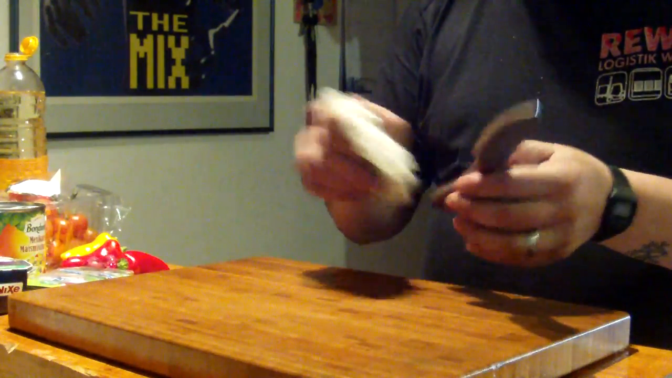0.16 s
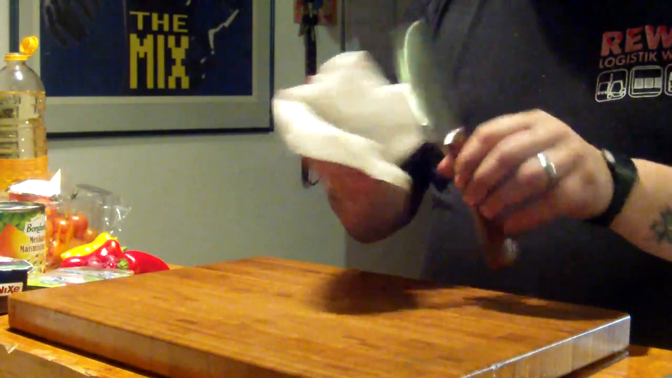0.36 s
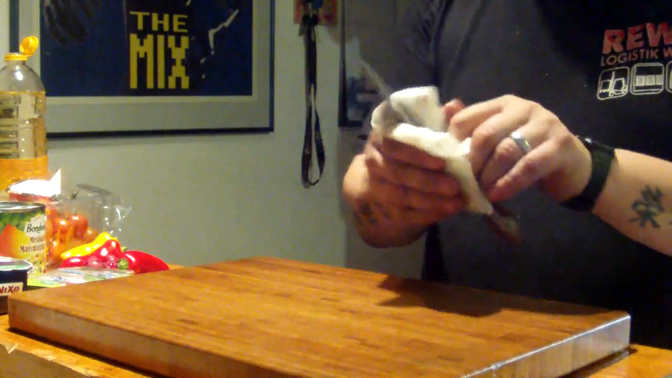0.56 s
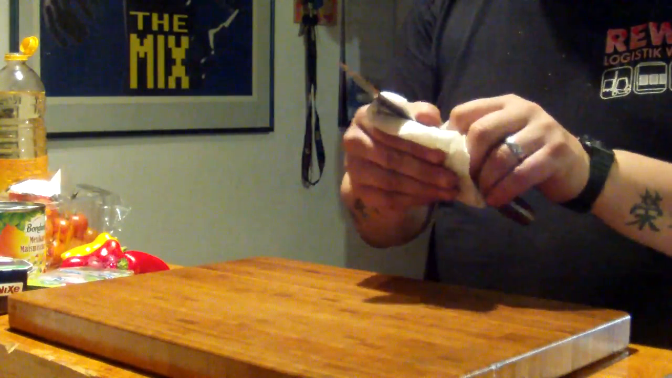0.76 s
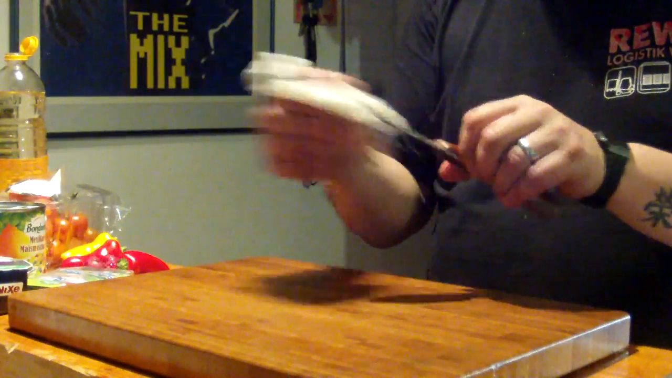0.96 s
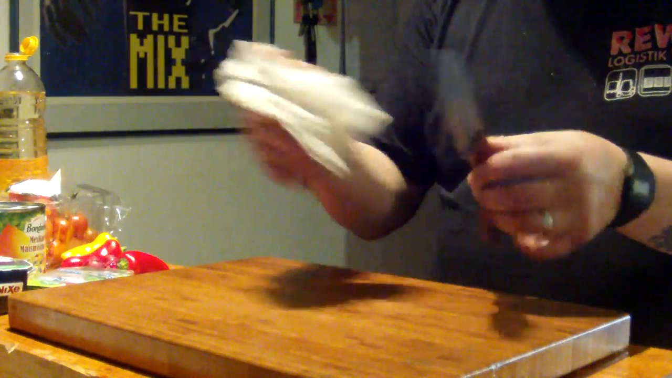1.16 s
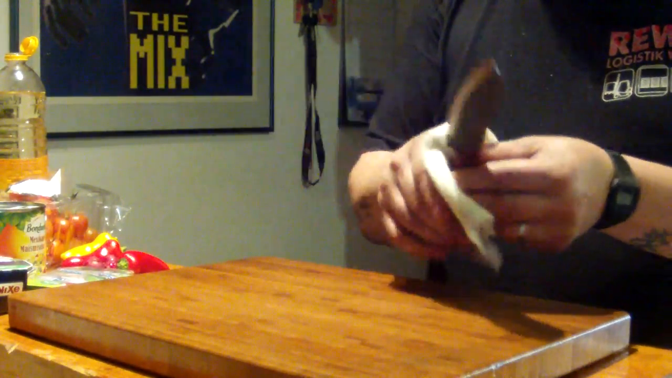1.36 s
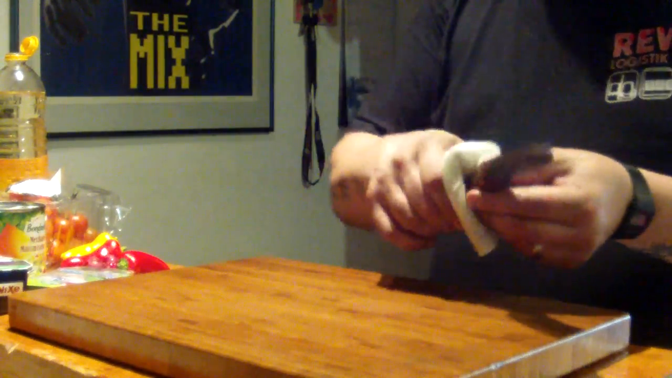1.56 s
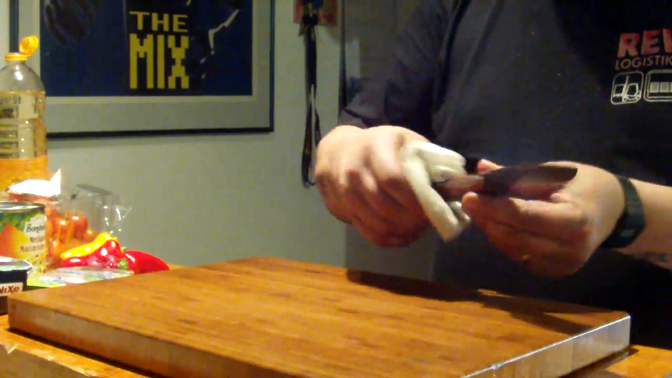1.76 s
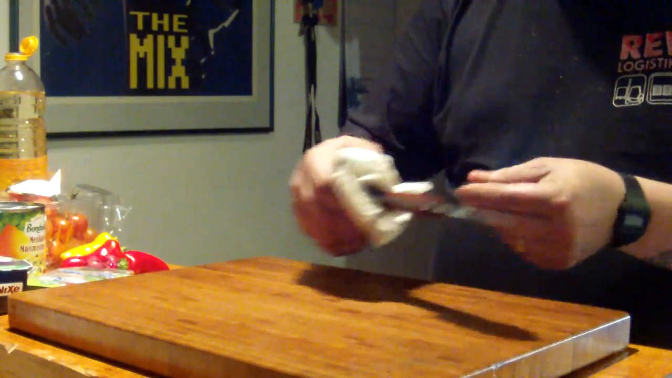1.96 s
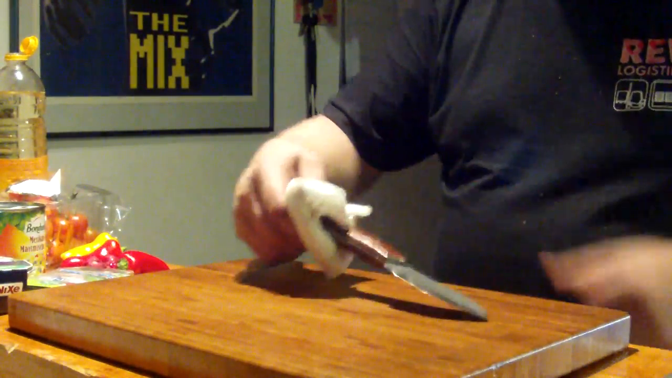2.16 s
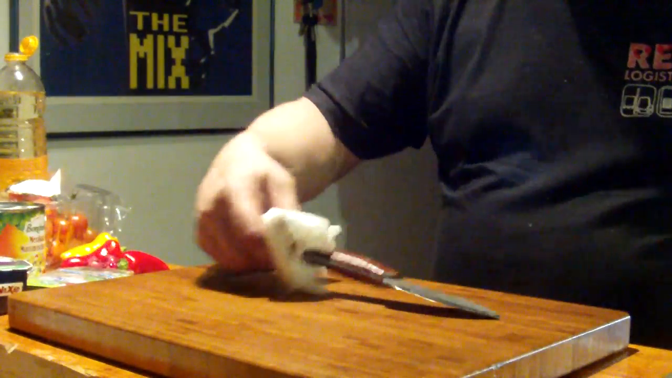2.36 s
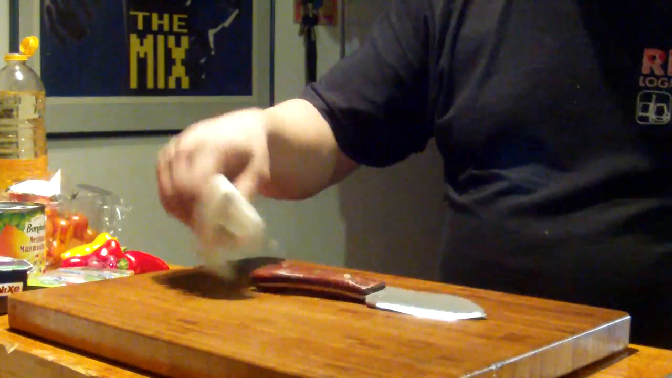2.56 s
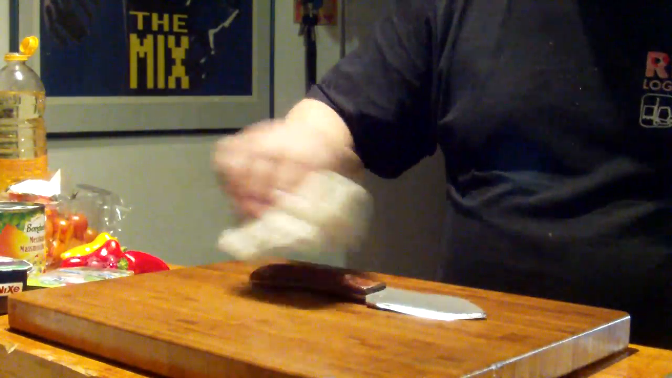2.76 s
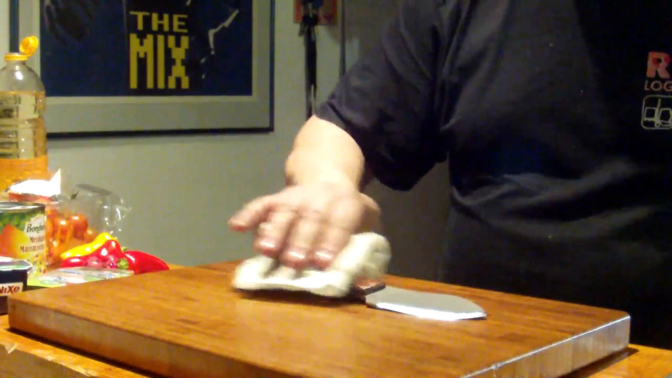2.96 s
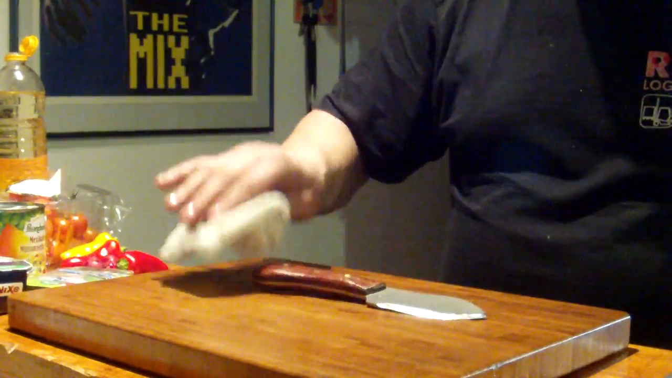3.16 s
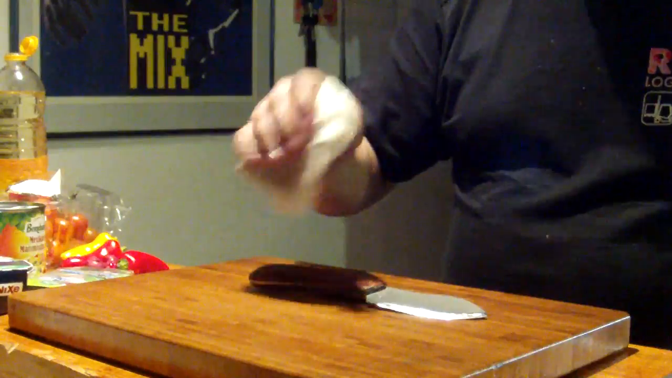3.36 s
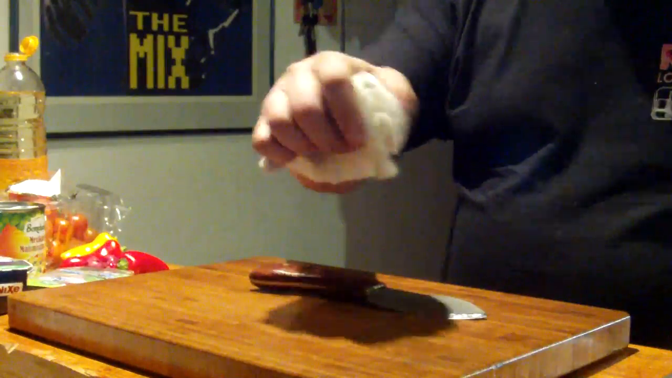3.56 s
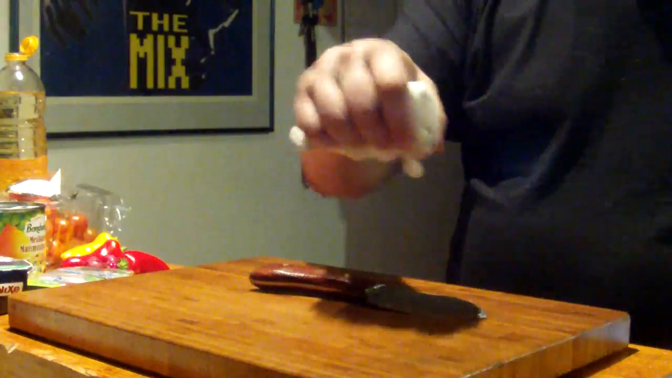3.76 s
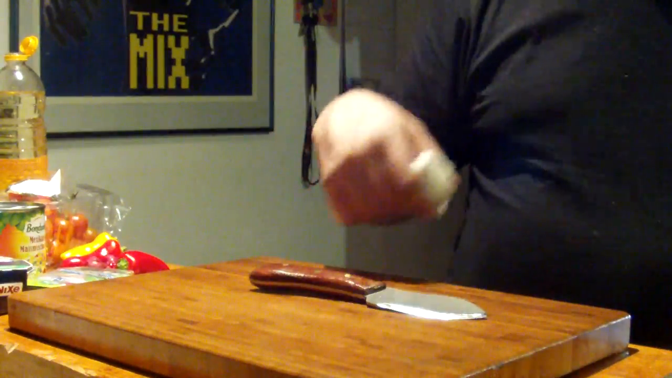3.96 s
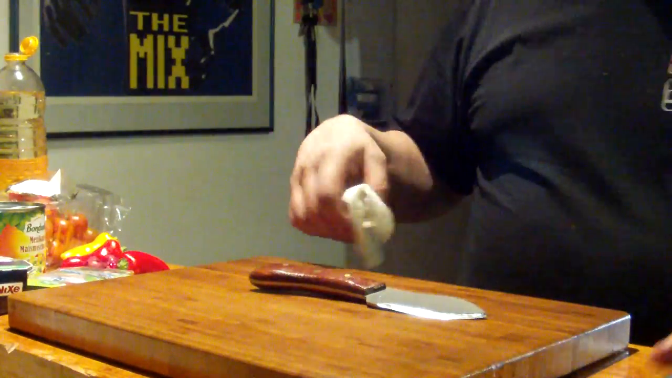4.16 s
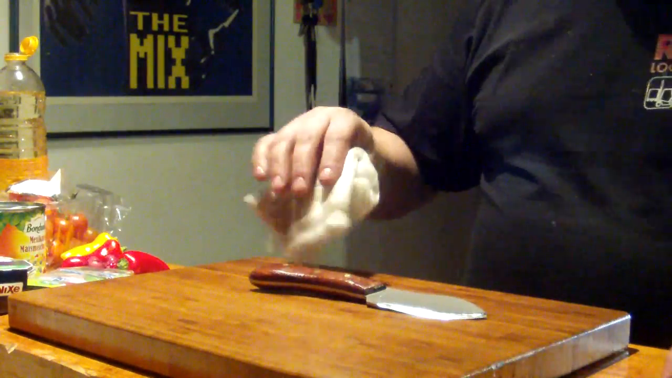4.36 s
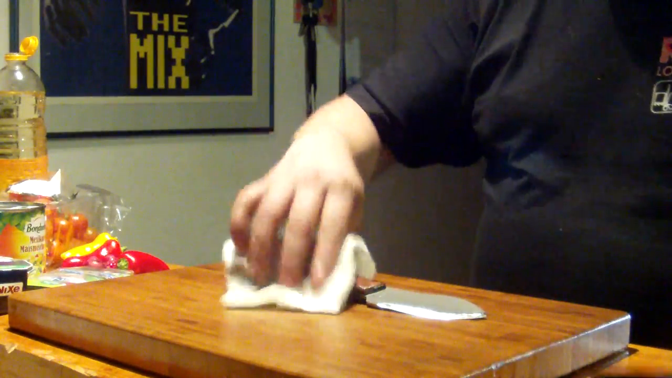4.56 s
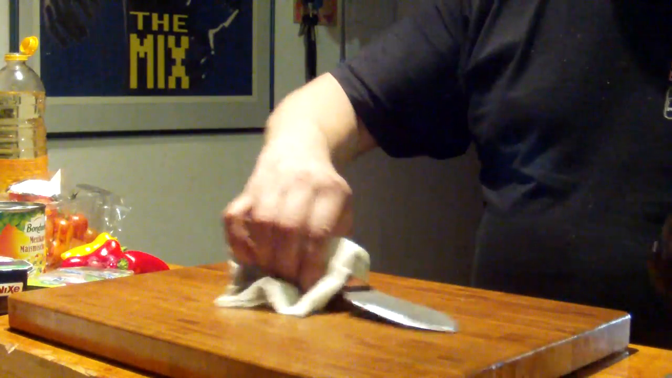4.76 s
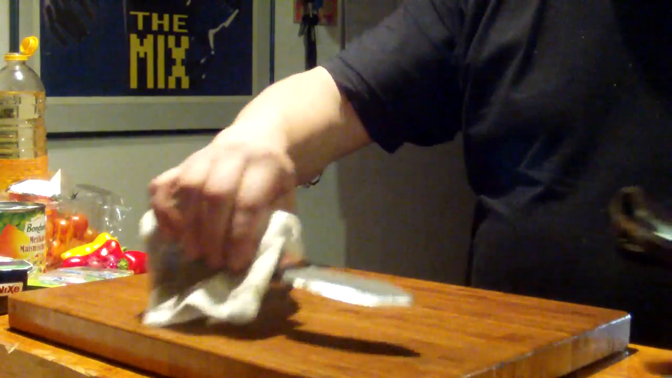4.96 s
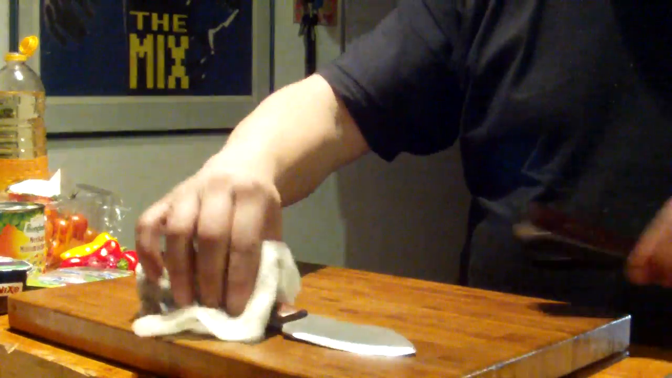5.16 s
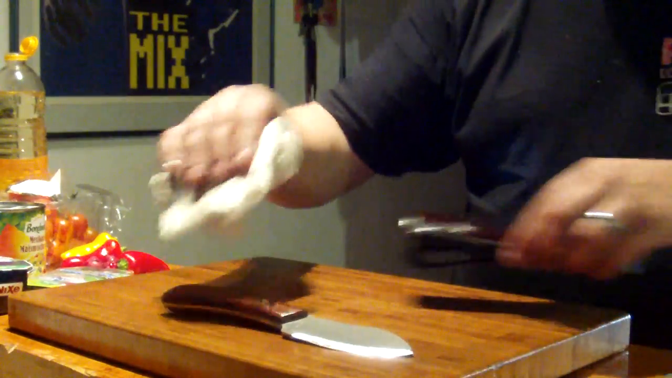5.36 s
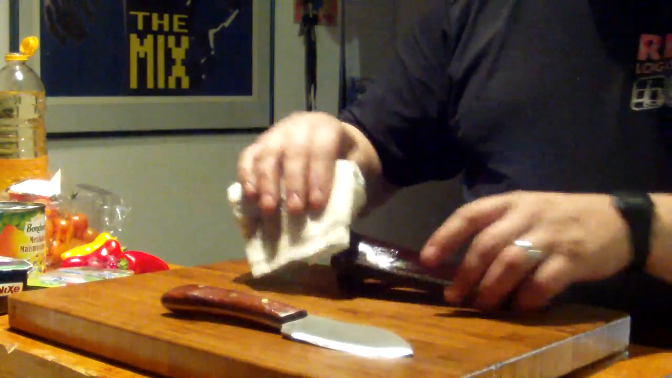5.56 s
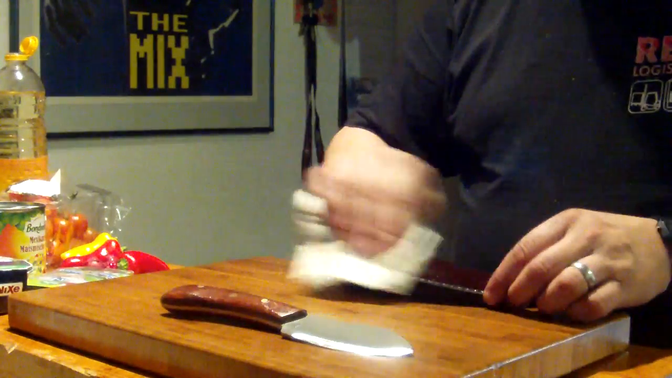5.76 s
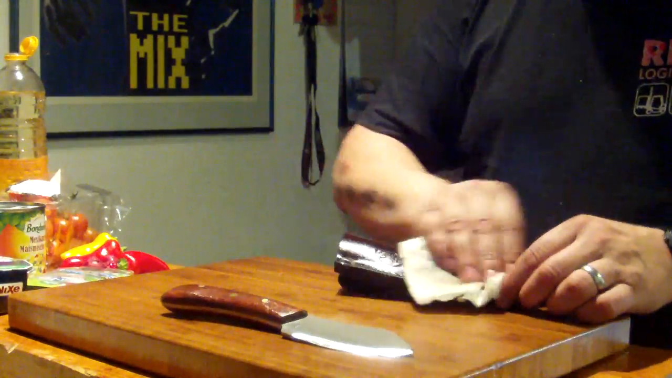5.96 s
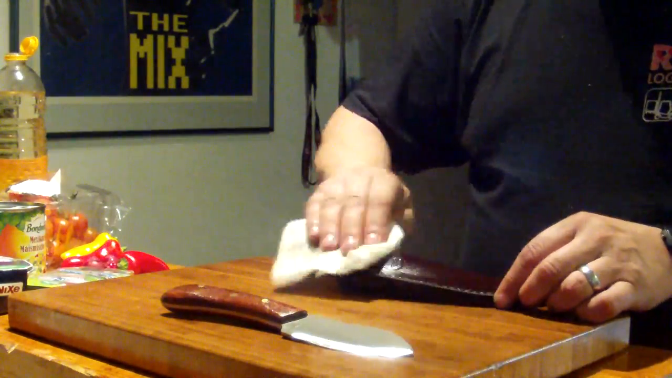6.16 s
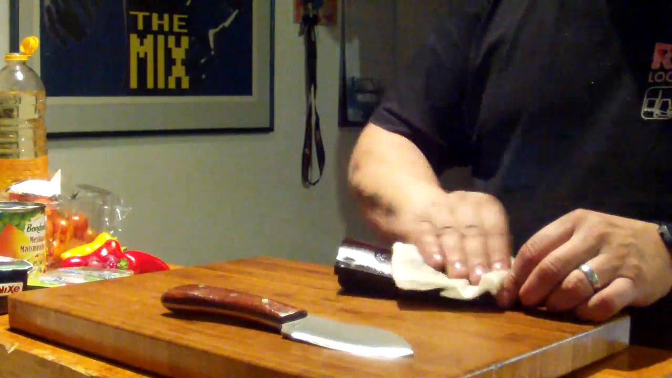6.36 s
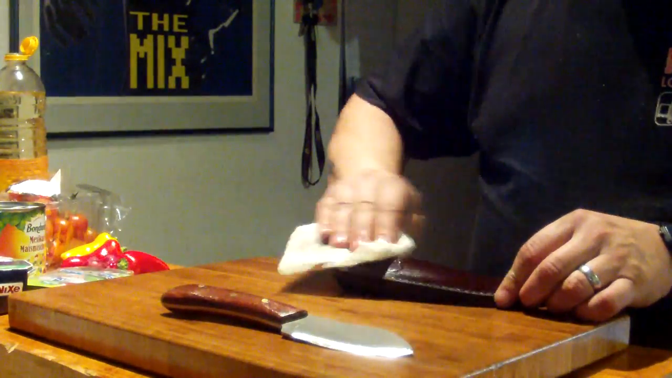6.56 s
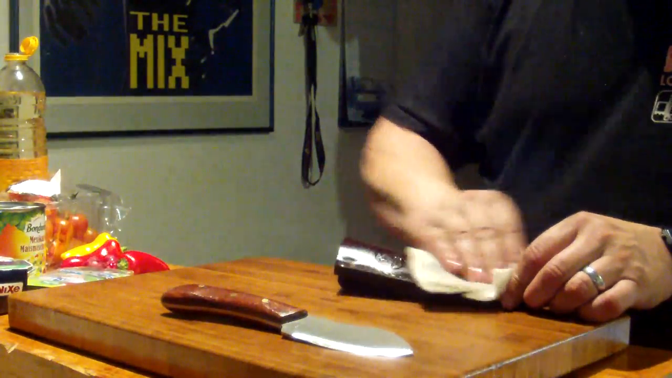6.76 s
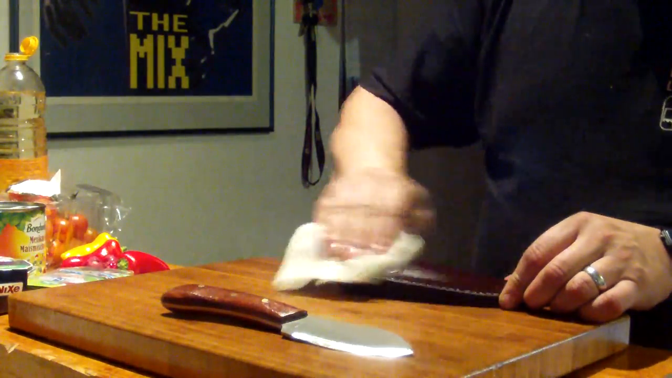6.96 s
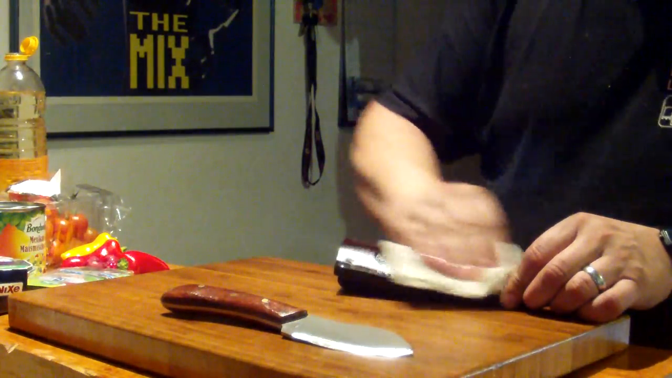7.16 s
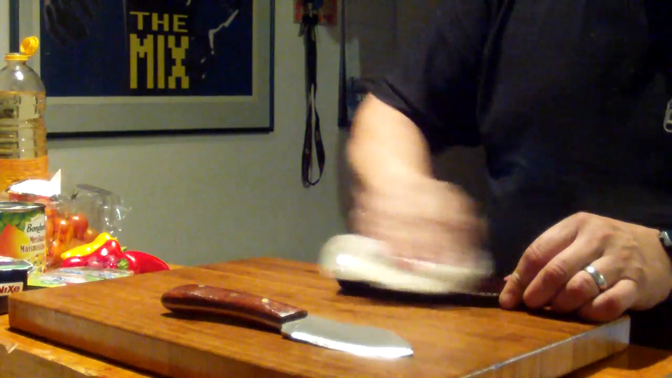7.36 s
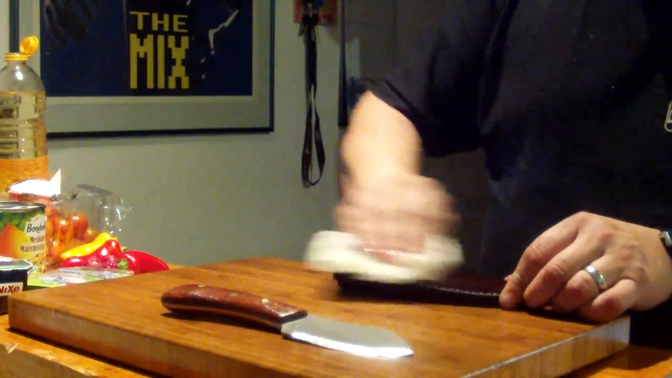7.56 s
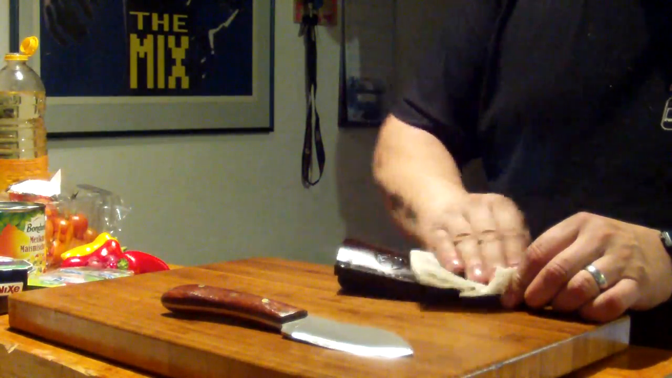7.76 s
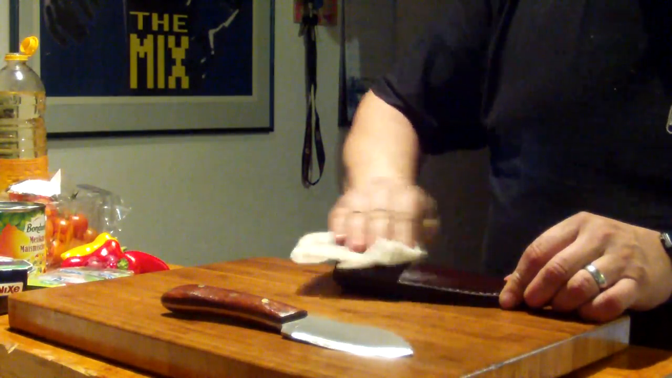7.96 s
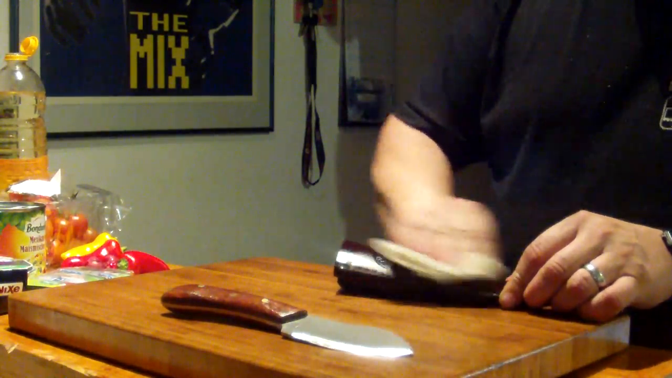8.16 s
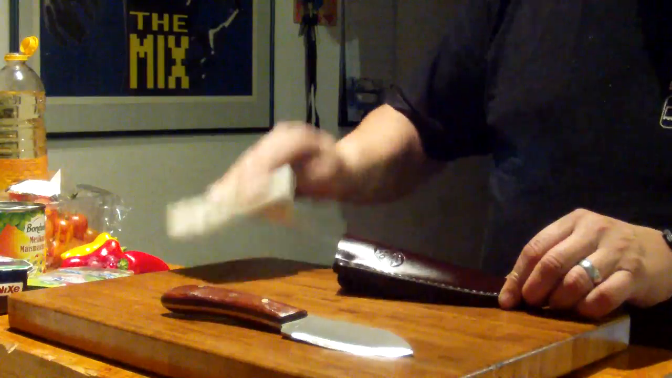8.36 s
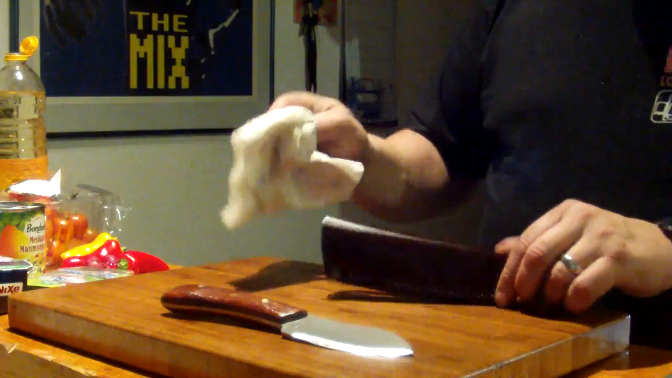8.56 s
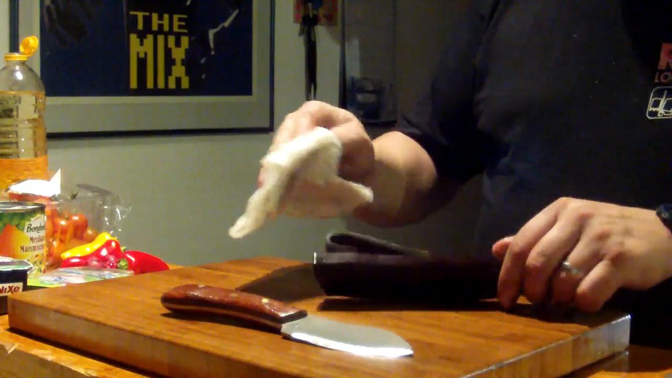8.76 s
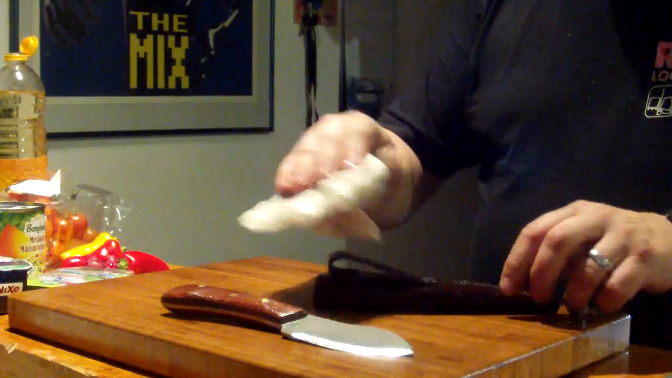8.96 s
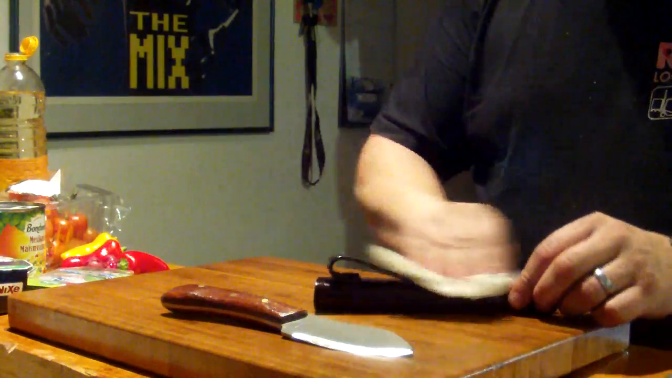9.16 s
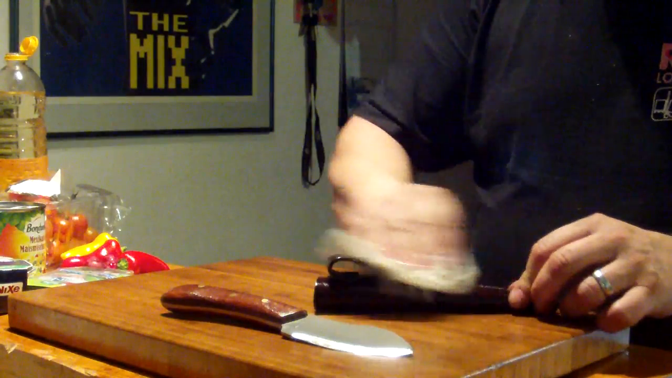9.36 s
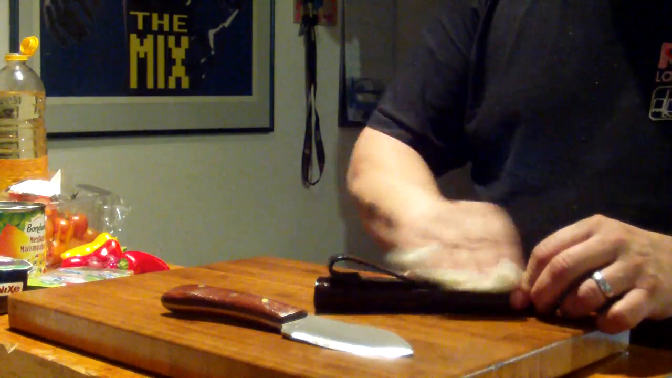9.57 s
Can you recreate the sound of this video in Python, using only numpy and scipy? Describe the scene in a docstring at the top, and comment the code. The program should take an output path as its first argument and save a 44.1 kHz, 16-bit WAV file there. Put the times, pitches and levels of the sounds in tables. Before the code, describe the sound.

Soft towel wipes, hard knife knocks on a wooden board, and quick dry scrubbing of a sheath, over camera ticking and low traffic rumble.

```python
"""A paper towel wipes a knife and its leather sheath over a thick board in a small kitchen: shaped grain noise.
Blade, handle and sheath knock on the wood (ringing modes, noisy cracks); creases in the paper tick.
A camera's lens drive ticks and sings through its case, and its electronics whine on steady sines.
Behind lie soft room hiss and tyre roar from noise, a deep unsteady rumble and an engine from wandering sines."""
import sys
import numpy as np
from scipy import signal
from scipy.fft import rfft, irfft
from scipy.io import wavfile

SR = 44100
rng = np.random.default_rng(int(sys.argv[2]) if len(sys.argv) > 2 else 0)


def store_wav(level_fs):
    """Save 16-bit WAV to argv[1]."""
    pcm = np.round(np.clip(np.atleast_2d(level_fs), -1, 1) * 32767)
    wavfile.write(sys.argv[1], SR, pcm.T.astype(np.int16))


N = 424683

# towel strokes, first on the knife, later back and forth along the sheath:
# start t/s, length/s, hiss level/dB, rub level/dB
STROKES = [(0.0, .2, -74, -69), (0.492, .14, -86, -80), (0.666, 0.087, -72.5, -64),
           (0.864, 0.17, -67.5, -66), (1.39, 0.075, -76.5, -71), (1.513, .36, -69.5, -64),
           (2.416, 0.17, -70, -74), (2.9, .2, -79, -72), (3.5, .22, -79, -65.5), (4.685, 0.21, -72, -61),
           (5.791, 0.28, -69.5, -65), (6.065, 0.22, -66, -65), (6.3, 0.15, -64.5, -64),
           (6.478, 0.17, -66.5, -66.5), (6.688, 0.16, -64, -60.5), (6.854, .18, -64.5, -61.5),
           (7.057, 0.15, -64.5, -59.5), (7.233, 0.16, -64.5, -62), (7.415, .13, -64, -59),
           (7.563, 0.16, -64.5, -63), (7.745, .13, -64.5, -59.5), (7.894, 0.15, -65, -64),
           (8.075, 0.14, -65, -62.5), (8.224, 0.16, -64, -61), (8.628, 0.2, -83, -70),
           (9.197, .15, -62, -57), (9.385, 0.15, -61, -57.5), (9.577, 0.11, -62, -62)]
# colour of the towel's fine hiss: f/Hz, level per Hz/dB
HISS_COLOUR = [(2120, -29), (3600, -14), (4380, -5.5), (4520, -6.5), (5280, -4), (5840, -7.5), (6700, -6.5),
               (8010, -17.5), (9470, -10), (12000, -14.5), (15000, -23.5)]
# colour of the towel's coarser, lower rubbing: f/Hz, level per Hz/dB
RUB_COLOUR = [(700, -49), (1200, 2.5), (1700, -10.5), (2400, -7), (3050, -4.5), (3700, -6.5), (5000, -36.5)]
ATTACK_S, RELEASE_S = 0.018, 0.026
SWELL_DB = 6.5   # the hand is fastest mid-stroke
LEAN_DB = -1   # level change from start to end of a stroke
HELD_HISS_DB, HELD_RUB_DB, FIDGET_DB = -79, -75.5, 3.5   # the towel rustles while held

# knocks on the board: t/s, striker, blow level/dB, depth level/dB, handle ring level/dB, crack level/dB
KNOCKS = [(2.2677, "blade", -26, 6, -24, -8.5), (2.3075, "blade", -30.5, -3, -8, -8),
          (2.406, "handle", -40.5, -15, -23, -18), (2.5009, "handle", -48, 6, 0, -16),
          (2.5509, "handle", -22, 3, -3.5, -36), (2.603, "blade", -25.5, 4, -2, -13),
          (2.6381, "handle", -14.5, -8, -9, -32), (2.652, "handle", -26.5, 5.5, 1, -18),
          (4.7108, "handle", -33, 0.5, -9, -11), (4.7415, "sheath", -40, -2, -21, -28),
          (4.7585, "handle", -31, 4.5, 1.5, -8.5), (5.158, "blade", -17.5, -21, -26, -3.5),
          (5.1647, "blade", -27, -16, -13, -18), (5.1775, "handle", -5.5, -3.5, 2, -15.5),
          (5.1848, "sheath", -16, -1.5, -30, -30), (5.2419, "handle", -24, -6, -21, -9),
          (5.2782, "handle", -34.5, 2.5, -12, -3), (5.5744, "sheath", -33, -0.5, -21, -11.5),
          (5.641, "sheath", -34.5, -2.5, -19, -21.5), (5.6831, "sheath", -39, 2.5, -11, -19.5),
          (6.3867, "sheath", -44, 2, -20, -23), (8.6731, "sheath", -41, -13, -8, -23),
          (8.6977, "sheath", -43.5, 6, -18, -24), (8.708, "sheath", -47.5, -4, -10, -14),
          (9.0354, "sheath", -42, 3.5, -17, -15), (9.046, "sheath", -44, -4, -12, -15),
          (9.0748, "sheath", -43, -8, -13, -24), (9.2405, "sheath", -35.5, -8.5, -19, -20)]
# how each thing shares a blow: thud level/dB, wood level/dB,
# and over the crack: bright edge level/dB, steel ring level/dB
STRIKERS = {"blade": (-36, -8.5, -20, 3), "handle": (-16.5, -9.5, -31, -14), "sheath": (-7, -3, -25.5, -22)}
# modes of the board with the knife: f/Hz, level/dB, T60/s
BOARD_MODES = [(111, -9, 0.094), (184, -9, 0.11), (235.6, -8, 0.068), (312.6, 0, 0.13), (432.5, 0, 0.095),
               (510, 3.5, 0.073), (703.5, 4, 0.059), (827, -1, 0.051), (938, 1.5, 0.026),
               (1096, -6.5, 0.043), (1220, 0, 0.02), (1410, -1.5, 0.03), (1490, -2, 0.011),
               (1830, -6, 0.027), (2352, 0, 0.035), (3040, -3, 0.011), (3098, -1.5, 0.024)]
# modes of the steel blade, damped by the wood: f/Hz, level/dB, T60/s
STEEL_MODES = [(934, 0, .03), (1810, -2.5, 0.015), (3046, 3, .015), (4000, -7, .012), (5070, -6, .012),
               (6120, -12.5, 0.011), (7070, -7, 0.014), (9080, -12, 0.013), (11400, -18, .012),
               (14000, -24, .01)]
# colour of the crack, steel on wood: f/Hz, level per Hz/dB
CRACK_COLOUR = [(1200, -9.5), (2200, 2.5), (3050, 10.5), (3600, -8), (4000, 2.5), (4500, -3.5), (5100, -6),
                (6000, -7.5), (6600, -12), (8000, -54)]
# colour of the crack's bright edge: f/Hz, level per Hz/dB
EDGE_COLOUR = [(5500, -45), (6500, -36), (7150, 7), (7900, -41), (9100, -3.5), (10500, 2), (11300, -19),
               (15000, -26)]
CONTACT_S, CRACK_RISE_S, CRACK_T60_S = .00025, .0015, .014

# creases in the paper giving way: t/s, level/dB, f/Hz
SNAPS = [(0.33, -44, 3000), (1.0161, -34, 3000), (2.9472, -51, 2980), (3.598, -45, 3020),
         (4.5326, -48, 2960), (4.9661, -43, 3230), (6.34, -34, 2920), (6.773, -44, 3000),
         (6.8126, -27.5, 3000), (6.8184, -50, 3000), (8.918, -33, 2880), (8.9689, -41, 2972),
         (9.0977, -54, 2992)]

# reverberation of the kitchen: f/Hz, T60/s
ROOM_DECAY = [(100, 0.82), (400, 0.2), (1000, 0.23), (3000, 0.16), (6000, 0.2), (12000, 0.18)]
FIRST_ECHO_S, ROOM_DB = .007, -3

# lens drive steps: t/s, level/dB
LENS_STEPS = [(0.064, -49), (0.195, -62), (0.33, -44.5), (0.463, -42), (0.696, -40), (0.965, -43),
              (1.166, -39.5), (1.298, -39.5), (1.533, -40), (1.869, -40), (2.166, -40.5), (2.867, -42.5),
              (3.037, -41.5), (3.272, -41.5), (3.599, -41), (3.869, -41), (4.102, -42), (4.406, -40),
              (5.804, -41), (6.106, -41.5), (6.317, -43), (6.537, -45), (6.703, -42), (6.905, -46.5),
              (7.102, -41), (7.277, -45), (7.474, -43), (7.605, -42), (7.775, -41.5), (7.942, -43.5),
              (8.108, -40), (8.344, -43), (8.51, -43), (9.409, -40), (9.608, -43)]
# modes of the camera case: f/Hz, level/dB, T60/s
CASE_MODES = [(463, -0.5, 0.04), (1226, -6.5, 0.018), (1386, -5, 0.041), (2980, -6, 0.015),
              (3350, -11, 0.014)]
# lens motor runs: start t/s, length/s, f/Hz, RMS level/dB
MOTOR_RUNS = [(.665, 0.042, 3170, -69), (1.136, 0.032, 3190, -70), (1.466, 0.065, 3200, -71),
              (1.684, 0.03, 3190, -66), (1.729, 0.083, 3220, -78), (2.134, 0.041, 3270, -70.5),
              (3.2, .065, 5350, -80), (4.06, 0.043, 5340, -84), (4.2, 0.13, 3160, -81),
              (5.432, .04, 5350, -83), (5.536, 0.038, 3200, -70)]
STEP_S, PUSH_S, RATTLE_DB = 0.00796, .0004, -3

# whine of the electronics: multiple of scan rate, multiple of field rate, RMS level/dB
WHINE = [(1, 0, -79), (1, -1, -79), (1, -2, -85), (1, -4, -87), (.5, 0, -84)]
SCAN_HZ, FIELD_HZ = 15734.3, 59.94

# tyre roar from the street, swelling and sinking: t/s, RMS level/dB
STREET_LEVEL = [(0.0, -64.5), (0.85, -63), (2.15, -59.5), (2.85, -55), (3.2, -58.5), (7.3, -59),
                (8.66, -61), (9.63, -58)]
# colour of the tyre roar: f/Hz, level per Hz/dB
ROAR_COLOUR = [(200, -32), (450, 0), (900, 1.5), (1350, 1.5), (1650, -11.5), (3000, -35.5)]
# an engine outside speeds up, changes gear and speeds up again: t/s, f/Hz, RMS level/dB
ENGINE = [(3.0, 47.2, -65), (3.5, 48.4, -54), (4.5, 51, -60), (5.4, 54.5, -50.5), (5.7, 55, -76),
          (6.1, 33.4, -70), (6.7, 35.14, -52), (7.5, 38.66, -47), (8.2, 40.65, -48.5), (9.63, 42.67, -46)]
# uneven level of a deep, unsteady low rumble: t/s, RMS level/dB
RUMBLE_LEVEL = [(0.0, -42.5), (0.37, -54.5), (2.12, -42.5), (2.17, -60), (2.36, -42.5), (2.6, -56.5),
                (2.79, -38.5), (3.03, -43), (3.16, -62), (3.27, -46), (4.45, -46), (4.56, -67), (4.75, -44),
                (4.83, -56), (5.69, -41.5), (5.98, -63), (6.63, -46.5), (7.08, -48), (7.13, -68),
                (7.24, -46), (7.67, -41.5), (7.83, -51), (7.99, -43), (8.31, -56.5), (9.52, -35),
                (9.63, -45)]
RUMBLE_HZ, RUMBLE_WANDER_HZ = 23.6, 0.586
# colour of the room air: f/Hz, level per Hz/dB
AIR_COLOUR = [(18, -11), (30, -7), (45, -12), (81, -15), (200, -19.5), (400, -26), (700, -33.5), (950, -34),
              (1350, -41), (1650, -40), (3300, -47), (7500, -63.5), (14100, -57), (15700, -55.5)]
AIR_DB, CUTOFF_HZ = -49.5, 15784


def from_db(db):
    """Decibels to amplitude."""
    return 10 ** (np.asarray(db) / 20)


def rms_one(x):
    """Scales a signal to an RMS of 1."""
    return x / np.sqrt(np.mean(x ** 2) + 1e-20)


def in_time(rows):
    """Draws straight lines between the timed rows, one curve per column."""
    s, *columns = np.transpose(rows)
    return [np.interp(np.arange(N) / SR, s, c) for c in columns]


def coloured(x, spectrum):
    """Shapes a noise by a spectrum drawn on a log-frequency axis; RMS 1."""
    hz, db = np.transpose(spectrum)
    axis_hz = np.maximum(np.fft.rfftfreq(N, 1 / SR), 1)
    gain = from_db(np.interp(np.log(axis_hz), np.log(hz), db))
    return rms_one(irfft(rfft(x) * gain, N))


def clicks(s, db):
    """One-sample blows at the given times and levels."""
    out = np.zeros(N)
    out[np.round(np.asarray(s) * SR).astype(int)] = from_db(db)
    return out


def ring(blows, hz, t60):
    """A two-pole resonator: each blow sets off a dying sine of about the blow's height."""
    r, w = from_db(-60 / (t60 * SR)), 2 * np.pi * hz / SR
    return signal.lfilter([0, np.sin(w)], [1, -2 * r * np.cos(w), r * r], blows + 1e-18)


def tone(hz, db):
    """A sine that follows pitch and RMS level."""
    return np.sqrt(2) * from_db(db) * np.sin(2 * np.pi * np.cumsum(hz) / SR)


def drift(rate):
    """Slow chance: noise through a double one-pole low-pass, spread 1."""
    r = np.exp(-2 * np.pi * rate / SR)
    slow = signal.lfilter([1], [1, -2 * r, r * r], rng.standard_normal(N + SR))
    return rms_one(slow[SR:])


def towel():
    """Fibres catch and let go: dense grains of uneven size, a fine hiss over a coarser, lower rubbing."""
    t = np.arange(N) / SR
    fidget = from_db(FIDGET_DB * drift(3.8))
    hiss, rub = from_db(HELD_HISS_DB) * fidget, from_db(HELD_RUB_DB) * fidget
    for start, length, hiss_db, rub_db in STROKES:
        along = np.clip((t - start) / length, 0, 1)
        ramps = np.minimum((t - start) / ATTACK_S, (start + length - t) / RELEASE_S)
        edges = np.clip(ramps + .5, 0, 1)
        swell_db = SWELL_DB * (np.sin(np.pi * along) - 1.5)
        stroke = edges * from_db(swell_db + LEAN_DB * (along - .5))
        hiss = hiss + from_db(hiss_db) * stroke
        rub = rub + from_db(rub_db) * stroke
    sizes = np.minimum(rng.exponential(1, (2, N)), 5)
    fine = rng.standard_normal(N) * from_db(2.4 * sizes[0])
    coarse = rng.standard_normal(N) * from_db(2.5 * sizes[1]) * (rng.random(N) < .3)
    return hiss * coloured(fine, HISS_COLOUR) + rub * coloured(coarse, RUB_COLOUR)


def knocks():
    """Each blow shares its force among deep thud, wood, handle ring, steel and a short noisy crack."""
    s, blow_db, depth_db, handle_db, crack_db = np.transpose([(s, *rest) for s, _, *rest in KNOCKS])
    thud_db, wood_db, edge_db, steel_db = np.transpose([STRIKERS[row[1]] for row in KNOCKS])

    # each blow lands on its own spot and wakes the modes unevenly
    spot_db = rng.normal(0, 1.5, (len(s), len(BOARD_MODES)))
    body = np.zeros(N)
    for k, (hz, db, t60) in enumerate(BOARD_MODES):
        if hz < 600:
            part_db = thud_db + depth_db
        elif hz < 1000:
            part_db = wood_db + depth_db
        elif hz < 1600:
            part_db = 0
        else:
            part_db = handle_db
        blows = clicks(s, blow_db - 4 + db + part_db + spot_db[:, k])
        body += (-1) ** k * ring(blows, hz, t60)
    contact = np.hanning(int(CONTACT_S * SR) + 3)   # wood yields, so the modes start softly
    out = np.convolve(body, contact / contact.sum())[:N]

    struck = clicks(s, blow_db + crack_db + steel_db)
    for k, (hz, db, t60) in enumerate(STEEL_MODES):
        out += (-1) ** k * from_db(db) * ring(struck, hz, t60)

    rise = np.hanning(int(CRACK_RISE_S * SR))
    fade = from_db(-60 / (CRACK_T60_S * SR))
    for db, spectrum in ((crack_db, CRACK_COLOUR), (crack_db + edge_db, EDGE_COLOUR)):
        onset = np.convolve(clicks(s, blow_db + db + 7.5), rise / rise.sum())[:N]
        burst = signal.lfilter([1], [1, -fade], onset + 1e-18)
        out += burst * coloured(rng.standard_normal(N), spectrum)
    return out


def snaps():
    """A crease in the paper gives way: a broad tick that dies within about two cycles."""
    return sum(ring(clicks([s], db), hz, 2.0 / hz) for s, db, hz in SNAPS)


def kitchen(x):
    """Dense echoes: noise that builds up to the first echo and dies band by band."""
    t = np.arange(SR // 2) / SR
    hz, t60 = np.transpose(ROOM_DECAY)
    edges, tail = np.geomspace(60, 16000, num=10), 0
    for low, high in zip(edges, edges[1:]):
        band_pass = signal.butter(2, [low, high], "band", fs=SR, output="sos")
        band = signal.sosfilt(band_pass, rng.standard_normal(len(t)))
        band_t60 = np.interp(np.log(low * high) / 2, np.log(hz), t60)
        tail = tail + band * from_db(-60 * t / band_t60)
    tail *= np.clip(t / FIRST_ECHO_S, 0, 1) ** 2
    return signal.fftconvolve(x, tail / np.sqrt(np.sum(tail ** 2)))[:N]


def lens():
    """Each step drives a short rattle with a soft push midway into the case; the motor sings in brief runs."""
    s, db = np.transpose(LENS_STEPS)
    width, soft = int(STEP_S * SR), np.hanning(int(PUSH_S * SR))
    rattle_level = np.convolve(clicks(s, db + RATTLE_DB), np.hanning(width))[:N]
    rattle = rattle_level * rng.standard_normal(N) / np.sqrt(width)
    push = np.convolve(clicks(s + STEP_S / 2, db), soft / soft.sum())[:N]
    out = sum(from_db(mode_db) * ring(push + rattle, hz, t60) for hz, mode_db, t60 in CASE_MODES)
    t = np.arange(N) / SR
    for start, length, hz, run_db in MOTOR_RUNS:
        running = np.clip(np.minimum(t - start, start + length - t) / .004, 0, 1)   # 4 ms fades
        out += np.sqrt(2) * from_db(run_db) * running * np.sin(2 * np.pi * hz * t)
    return out


def whine():
    """The electronics sing steadily at sums of scan-rate and field-rate multiples."""
    t = np.arange(N) / SR
    out = np.zeros(N)
    for scans, fields, db in WHINE:
        hz = scans * SCAN_HZ + fields * FIELD_HZ
        out += np.sqrt(2) * from_db(db) * np.sin(2 * np.pi * hz * t)
    return out


def street():
    """Distant road noise, dulled by the window."""
    level_db, = in_time(STREET_LEVEL)
    return from_db(level_db) * coloured(rng.standard_normal(N), ROAR_COLOUR)


def engine():
    """A low sine glides with the engine's speed, fading in over 0.3 s before the first row."""
    t = np.arange(N) / SR
    fade_in = np.clip((t - ENGINE[0][0]) / .3 + 1, 0, 1)
    return fade_in * tone(*in_time(ENGINE))


def rumble():
    """A deep, unsteady rumble near 24 Hz, approximated by a wandering sine with an uneven level."""
    return tone(RUMBLE_HZ + RUMBLE_WANDER_HZ * drift(1.36), *in_time(RUMBLE_LEVEL))


def room_air():
    """Steady coloured noise: soft hiss over a heavy low end."""
    return from_db(AIR_DB) * coloured(rng.standard_normal(N), AIR_COLOUR)


def scene():
    """Knocks and snaps ring in the kitchen; every other layer is added without echoes."""
    hits = knocks() + snaps()
    table = hits + from_db(ROOM_DB) * kitchen(hits) + towel()
    devices = lens() + whine()
    background = street() + engine() + rumble() + room_air()
    return (table + devices + background)[None]


def record(dry):
    """A steep elliptic low-pass cuts the top."""
    low_pass = signal.ellip(14, .5, 60, CUTOFF_HZ, fs=SR, output="sos")
    return signal.sosfilt(low_pass, dry)


dry = scene()
out = record(dry)
store_wav(out)
```